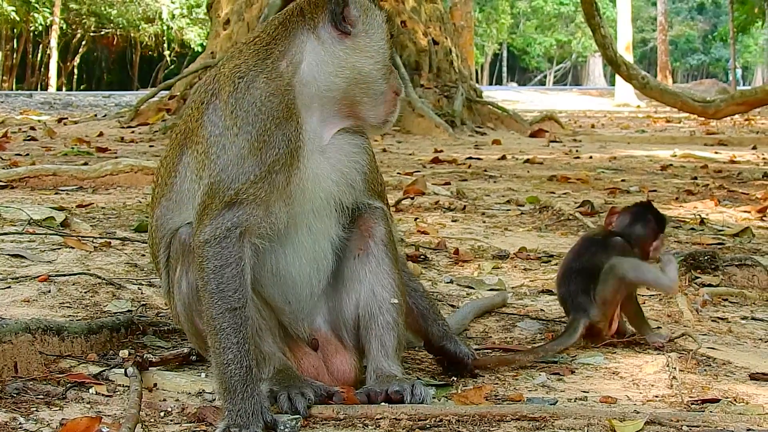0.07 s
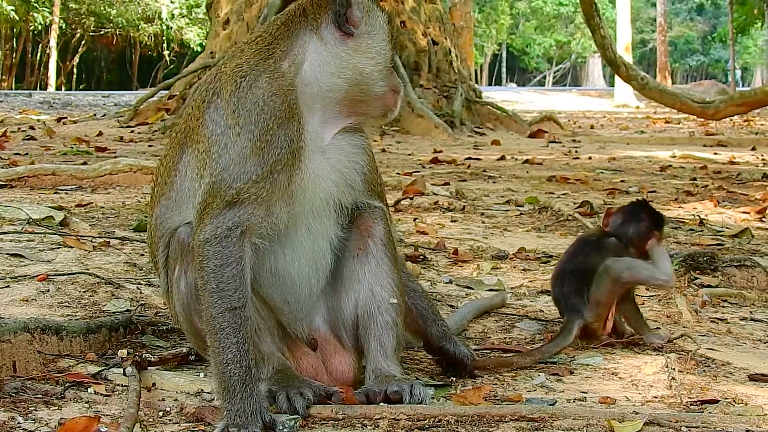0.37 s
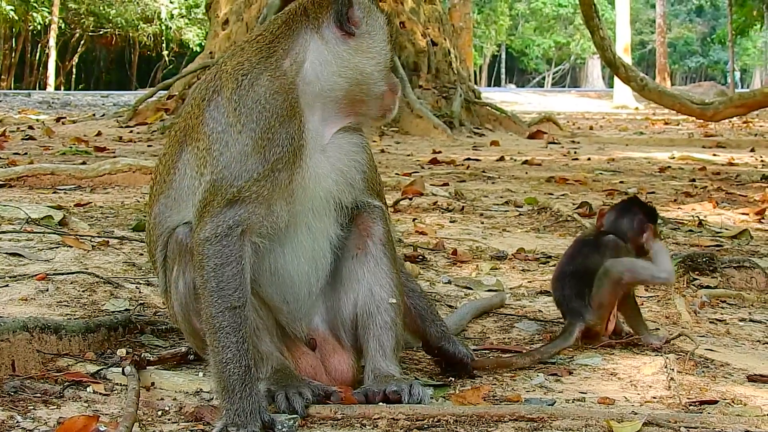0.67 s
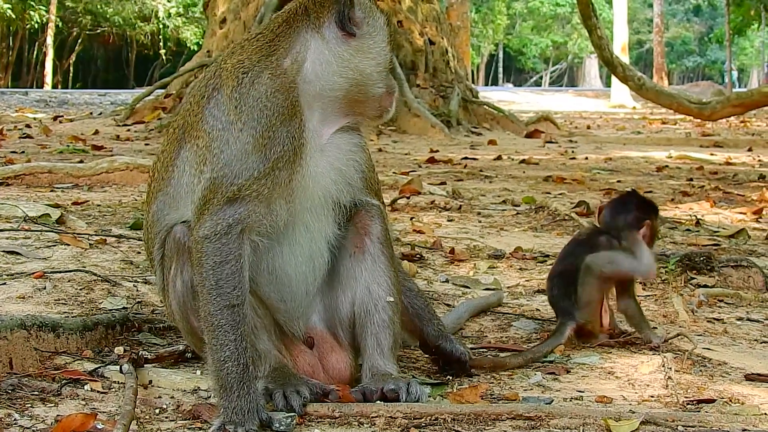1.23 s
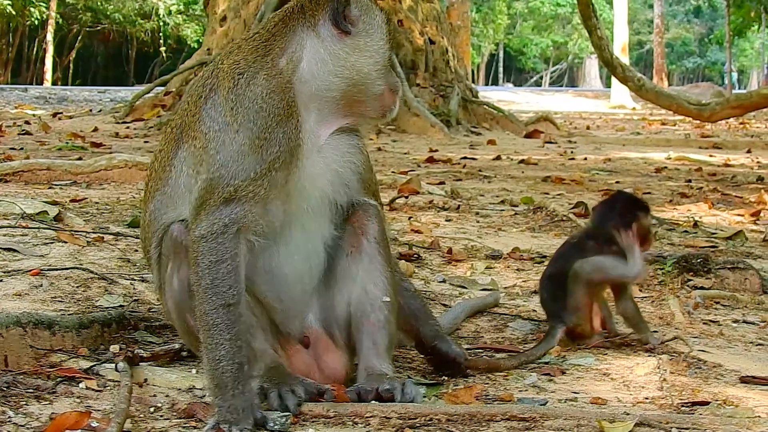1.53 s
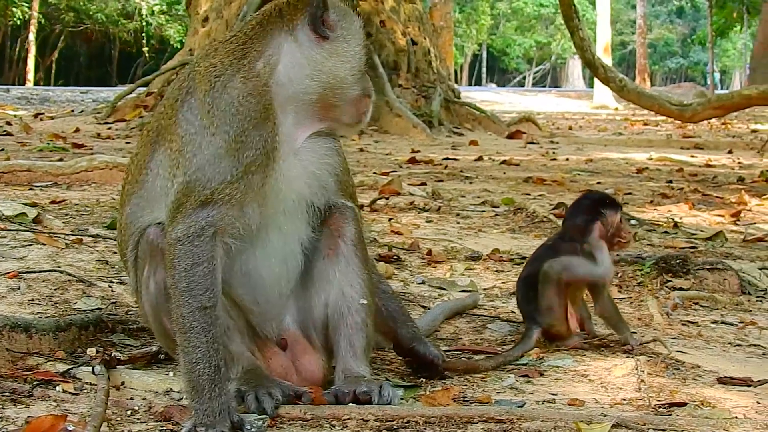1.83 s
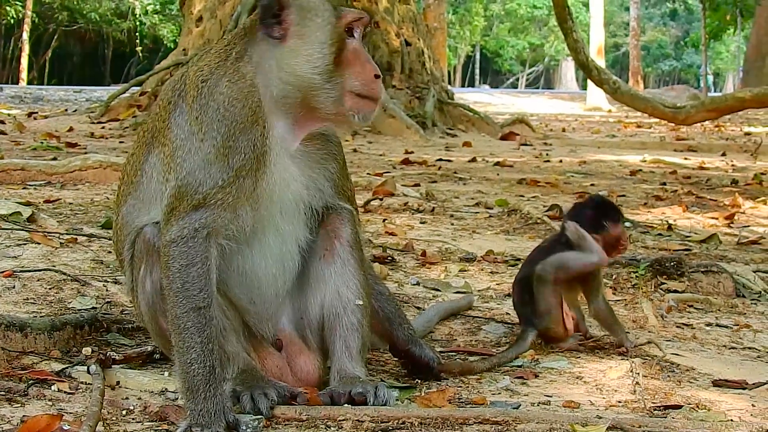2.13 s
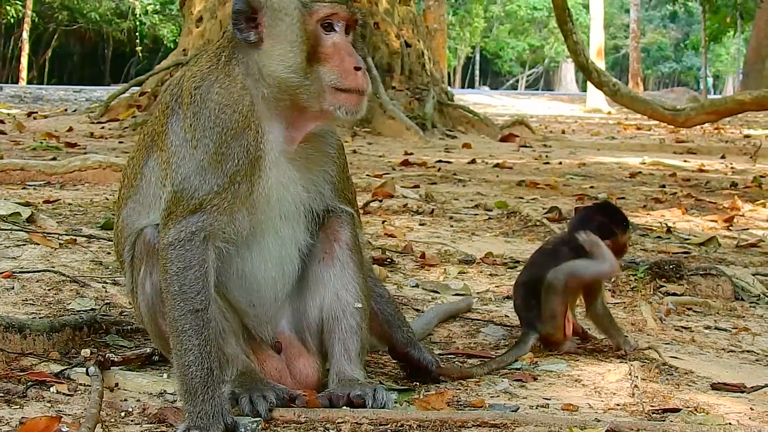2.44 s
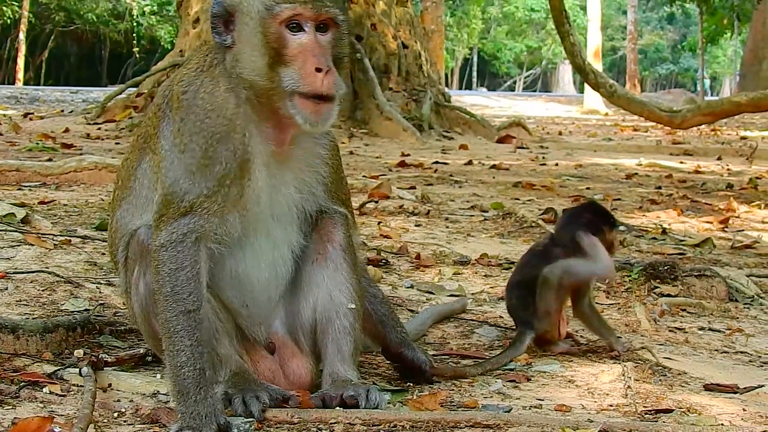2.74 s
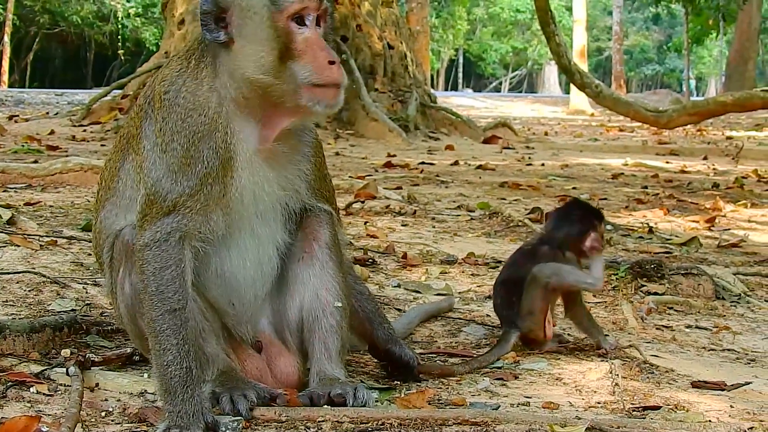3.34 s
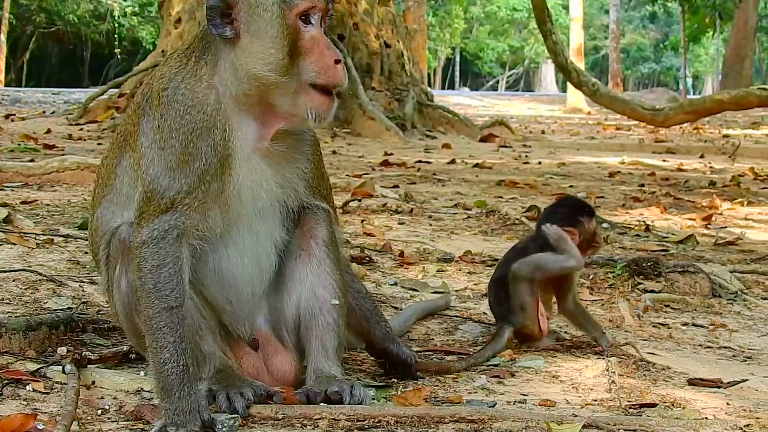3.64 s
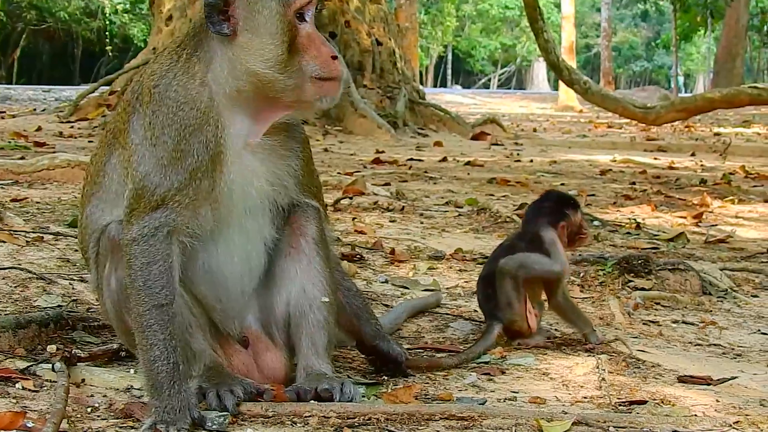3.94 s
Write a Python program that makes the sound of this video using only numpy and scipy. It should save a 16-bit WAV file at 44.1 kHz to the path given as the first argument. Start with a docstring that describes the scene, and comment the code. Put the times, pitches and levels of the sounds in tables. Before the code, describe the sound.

Very close to the microphone, dry leaves crackle and scuff on a forest floor, opening with a sharp snap and another soon after. Short rustles, ticks and soft bumps continue while light wind and a far engine murmur underneath.

```python
"""Dry leaves rustle on forest ground, very close to a microphone with two ports.
Each sweep is a shower of tiny crackles that ring the two ports separately, and a few ticks stand out.
Firmer contact adds duller scuffs, soft bumps and two sharp snaps.
Light wind murmurs underneath, and a far engine hums as it slowly loses speed."""
import sys
import numpy as np
from scipy import signal
from scipy.fft import rfft, irfft
from scipy.io import wavfile
from scipy.ndimage import uniform_filter1d

SR = 44100
rng = np.random.default_rng(int(sys.argv[2]) if len(sys.argv) > 2 else 0)


def transcribe(signal):
    """Save signal, clipped to [-1, 1], as a 16-bit WAV file at the path in sys.argv[1]."""
    frames = np.atleast_2d(signal).T
    limited = np.clip(frames, -1, 1)
    pcm = np.round(limited * 32767).astype(np.int16)
    wavfile.write(sys.argv[1], SR, pcm)


N = 176400
TIME = np.arange(N) / SR
FREQ = np.arange(N // 2 + 1) * SR / N


def undb(db):
    """Amplitude ratio of a level in decibels."""
    return 10 ** (np.asarray(db) / 20)


def unit(x):
    """Normalisation of each channel to rms 1."""
    return x / np.sqrt(np.mean(x ** 2, axis=-1, keepdims=True))


def colour(x, spectrum):
    """Spectral shaping by (frequency [Hz], level [dB]) points; white noise keeps its power."""
    hz, db = np.array(spectrum).T
    gain = undb(np.interp(np.log(np.maximum(FREQ, 1)), np.log(hz), db))
    return irfft(rfft(x) * unit(gain), N)


def wander(rate_hz):
    """Slow random modulation: smoothed Gaussian steps of rms 1."""
    k = max(int(SR / rate_hz), 2)
    steps = np.repeat(rng.standard_normal(N // 100)[:N // k + 2], k)
    return unit(uniform_filter1d(uniform_filter1d(steps, k), k)[:N])


def pan(db):
    """Channel gains for a level difference, left minus right."""
    return undb(np.array([[db], [-db]]) / 2)


def crackles(per_s, spread_db):
    """Shot noise: random impulses of unequal size, independent at the two ports."""
    size = undb(spread_db * np.minimum(rng.exponential(size=(2, N)), 4))
    occurs = rng.random((2, N)) < per_s / SR
    return unit(occurs * size * rng.choice([-1, 1], (2, N)))


def stroke(start, rise, hold, fade_db_s):
    """Envelope with a linear rise, a plateau and an exponential decay."""
    t = TIME - start
    return np.clip(t / rise, 0, 1) * undb(-fade_db_s * np.maximum(t - rise - hold, 0))


def burst(noise, at, width_s, db):
    """Noise under a Gaussian window, with rms level db at its crest."""
    bell = np.exp(-.5 * ((TIME - at) / width_s).clip(-10, 10) ** 2)
    return unit(noise * bell) * np.sqrt(np.mean(bell ** 2)) * undb(db)


def share_bass(x, corner_hz):
    """Low-frequency coherence: long waves reach both ports alike."""
    apart = FREQ / np.hypot(FREQ, corner_hz)
    mid, side = rfft(x[0] + x[1]) / 2, rfft(x[0] - x[1]) / 2
    return irfft(mid * np.sqrt(2 - apart ** 2) + side * apart * np.array([[1], [-1]]), N)


# Line spectrum of the engine (harmonic number, rms level [dB])
ENGINE_HARMONICS = [(2, -46), (3, -43.5), (4, -53), (5, -52), (8, -53.5)]
def engine(start_hz=32.44, sag_hz_s=0.57, waver_db=2, waver_rad=0.44):
    """Harmonic series on a falling fundamental; each partial wavers in level and phase."""
    phase = 2 * np.pi * np.cumsum(start_hz - sag_hz_s * TIME) / SR
    out = np.zeros(N)
    for k, db in ENGINE_HARMONICS:
        amplitude = np.sqrt(2) * undb(db - waver_db * wander(5.98))
        offset = 2 * np.pi * rng.random() + waver_rad * wander(9)
        out += amplitude * np.sin(k * phase + offset)
    return out


# Wind spectra, in phase and in antiphase at the ports (frequency [Hz], relative density [dB])
WIND_MID_SPECTRUM = [(20, -6.5), (45, -10.5), (80, 3.5), (120, 7), (170, -4.5), (250, -3), (350, -8.5),
                     (600, -9), (1300, -14), (2500, -18), (4500, -28.5), (7000, -45.5), (11000, -48.5),
                     (16000, -51)]
WIND_SIDE_SPECTRUM = [(20, 5), (60, -1), (120, 4), (250, -0.5), (500, -3.5), (1300, -6), (2500, -12),
                      (4500, -12), (7000, -31), (11000, -40), (16000, -42)]
def wind(mid_db=-41.5, side_db=-46.5, flutter_db=1, rise_db_s=1):
    """Partially coherent noise: a low murmur that flutters and slowly grows."""
    mid, side = (colour(rng.standard_normal(N) * undb(flutter_db * wander(25.08)), spectrum)
                 for spectrum in (WIND_MID_SPECTRUM, WIND_SIDE_SPECTRUM))
    swell = undb(rise_db_s * (TIME - N / SR / 2))
    return swell * (undb(mid_db) * mid + undb(side_db) * side * np.array([[1], [-1]]))


# Soft knocks (time [s], peak level [dB], spectral peak [Hz])
SOFT_KNOCKS = [(0.062, -23, 257), (0.157, -28, 220), (0.443, -32, 202), (.477, -26.5, 226),
               (0.61, -25.5, 205), (.932, -24.5, 140), (1.2951, -18.5, 190), (1.317, -30, 223),
               (1.473, -24, 286), (1.845, -29, 280), (1.907, -24.5, 280), (2.167, -28, 220),
               (2.634, -24.5, 139), (2.660, -22, 200), (2.809, -26, 205), (3.242, -33, 230),
               (3.532, -27, 218), (3.692, -27, 304)]
def bumps():
    """A soft impact gives one smooth pressure pulse with its rebound, alike at both ports."""
    out = np.zeros(N)
    for at, db, hz in SOFT_KNOCKS:
        u = (np.pi * hz * (TIME - at)).clip(-10, 10) ** 2
        out += undb(db) * (2 * u - 1) * np.exp(-u)  # second derivative of a Gaussian
    return out


# Spectrum of a scuff (multiple of its centre frequency, relative density [dB])
SCUFF_SPECTRUM = [(.07, 0), (.25, -9.5), (.5, -1.5), (1, 0), (1.5, -1.5), (2.2, -5), (4.5, -15), (10, -77)]
# Firm contacts (start [s], rise [s], hold [s], level [dB], left minus right [dB], centre [Hz])
SCUFF_STROKES = [(0.055, .02, .11, -33, -7.5, 1080), (0.196, 0.023, 0.11, -38, -8.5, 1050),
                 (0.386, 0.0066, 0.0062, -37, -7, 1130), (0.458, 0.0066, 0.0088, -37, -2, 686),
                 (0.6, 0.0086, 0.035, -40.5, -3, 1100), (0.766, 0.041, 0.074, -36.5, -8.5, 1210),
                 (0.933, 0.011, 0.14, -38.5, -7.5, 1070), (1.152, 0.0036, .003, -43, -4, 990),
                 (1.416, 0.026, 0.039, -36, -9, 1760), (1.524, .03, .15, -43, -10.5, 1100),
                 (1.801, 0.0056, 0.017, -37, -9, 780), (1.89, .006, 0.0063, -42.5, -10, 700),
                 (1.975, 0.015, 0.051, -34.5, -2, 1090), (2.049, 0.042, 0.073, -31, -8.5, 1240),
                 (2.276, 0.0058, 0.0088, -37, -3, 660), (2.48, 0.0077, 0.0089, -39, -2, 1240),
                 (2.558, 0.0083, 0.01, -43, 0, 1000), (2.689, 0.01, 0.0081, -43.5, -5, 1680),
                 (2.861, 0.0087, 0.014, -29.5, -9.5, 1470), (2.913, .008, .008, -59, -4, 1200),
                 (2.994, 0.0085, .008, -34, -1, 820), (3.03, 0.0084, 0.014, -41, -7, 700),
                 (3.092, 0.0018, 0.0035, -35, -3, 950), (3.109, 0.0096, 0.015, -29.5, -2.5, 1150),
                 (3.162, 0.0067, 0.01, -42, -5, 1250), (3.436, 0.014, .01, -41.5, 1, 1380),
                 (3.533, 0.005, .007, -32.5, 2, 1280), (3.66, 0.017, 0.078, -43, -4, 794),
                 (3.863, 0.0049, 0.0071, -42.5, -5, 796)]
def scuffs(flicker_db=2, fade_db_s=253):
    """Stick-slip friction: firmer contact catches and slips unevenly, mostly on the right."""
    catches = crackles(per_s=2600, spread_db=3.5) * undb(flicker_db * wander(110))
    out = np.zeros((2, N))
    for start, rise, hold, db, side_db, hz in SCUFF_STROKES:
        spectrum = [(k * hz, level) for k, level in SCUFF_SPECTRUM]
        friction = catches * stroke(start, rise, hold, fade_db_s)
        out += colour(friction, spectrum) * undb(db) * pan(side_db)
    return out


# Spectra of a snap's rub and release (frequency [Hz], relative density [dB])
RUB_SPECTRUM = [(80, -3), (250, 5.5), (700, 6), (1300, -1), (2300, 0), (3300, -11), (6000, -55),
                (12000, -65)]
RELEASE_SPECTRUM = [(200, -40), (2200, -14), (3200, 3), (4400, 0.5), (5000, 3), (6000, -7.5), (8000, -18),
                    (11000, -43), (16000, -42)]
# Snaps (release time [s], rub level [dB], release level [dB], release left minus right [dB])
SNAP_EVENTS = [(0.0731, -16, -8, -3), (0.9392, -18.5, -10.5, 1)]
def snaps(rub_lead_s=0.0098):
    """Sudden release of stress: a dull rub gives way in a bright transient."""
    rub = share_bass(colour(rng.standard_normal((2, N)), RUB_SPECTRUM), corner_hz=700)
    release = colour(rng.standard_normal((2, N)), RELEASE_SPECTRUM)
    out = np.zeros((2, N))
    for at, rub_db, release_db, side_db in SNAP_EVENTS:
        out += burst(rub, at - rub_lead_s, width_s=0.004, db=rub_db)
        out += burst(release, at, width_s=0.0016, db=release_db) * pan(side_db)
    return out


# Spectrum of a tick (multiple of its pitch, relative density [dB])
TICK_SPECTRUM = [(.1, -35), (.5, -6), (.75, -14), (1, 5.5), (1.15, -0.5), (1.4, -20), (2, -38.5), (3, -65)]
# Single crackles that stand out of the rustle (time [s], level [dB], pitch [Hz])
TICK_EVENTS = [(0.332, -21.5, 3960), (0.676, -27, 4300), (.706, -28, 4600), (0.7396, -26, 4600),
               (.770, -22.5, 4670), (.791, -24, 4540), (1.9145, -25.5, 4700), (1.944, -29, 4000),
               (2.151, -17.5, 4120), (2.168, -12.5, 4130), (2.586, -28, 4500), (2.886, -18.5, 4700),
               (3.893, -37, 6550)]
def ticks(width_s=0.001):
    """Band-limited transients: a spectral peak gives each dry crackle its pitch."""
    noise = rng.standard_normal((2, N))
    out = np.zeros((2, N))
    for at, db, hz in TICK_EVENTS:
        spectrum = [(k * hz, level) for k, level in TICK_SPECTRUM]
        out += burst(colour(noise, spectrum), at, width_s, db)
    return out


# Spectrum of the crackles at the ports (frequency [Hz], relative density [dB])
RUSTLE_SPECTRUM = [(60, -24), (250, -3.5), (700, -26), (1500, -13), (2500, -9), (3300, -5), (4200, -0.5),
                   (4900, -1), (5700, -10), (7000, -21), (9000, -34.5), (11500, -50.5), (16000, -65)]
# Sweeps of rustle (start [s], rise [s], hold [s], level [dB], decay [dB/s], tilt [dB/octave])
RUSTLE_SWEEPS = [(.08, 0.019, 0.071, -19, 93, 0), (0.303, 0.029, .018, -29.5, 74, 0.5),
                 (0.385, 0.013, 0.071, -37, 65, 2.5), (0.592, 0.025, 0.23, -40, 53, 0),
                 (0.778, 0.036, 0.03, -26.5, 39, 0.5), (0.943, 0.039, 0.11, -29, 110, 1.5),
                 (1.295, 0.034, 0.064, -37.5, 50, -2.5), (1.441, 0.0077, 0.098, -23, 76, 0.35),
                 (1.618, .03, 0.028, -30.5, 63, 0), (1.705, 0.0072, .02, -30, 70, 2),
                 (1.8, .025, .028, -32, 150, -1), (1.902, 0.0092, 0.041, -34, 96, 1),
                 (1.984, 0.13, .03, -25.5, 147, 0), (2.103, 0.04, 0.04, -24.5, 270, 0),
                 (2.21, 0.086, 0.089, -30.5, 60, 0), (2.493, 0.031, 0.066, -36, 134, 0),
                 (2.702, 0.0087, 0.007, -30, 224, 0.5), (2.737, .012, .015, -39.5, 125, 2.5),
                 (2.81, 0.031, 0.12, -31.5, 85, -0.5), (2.875, 0.011, 0.011, -22, 300, 0),
                 (2.989, 0.024, 0.04, -30.5, 110, -1.5), (3.109, 0.019, 0.037, -32, 119, 0),
                 (3.461, 0.093, 0.042, -31, 58, .5), (3.644, 0.048, 0.038, -29, 102, -.5),
                 (3.82, 0.0082, 0.11, -37, 90, -1)]
def rustle(rest_db=-46.5, hiss_gain=0.64, flicker_db=1.14, side_db=-0.45):
    """Superposed impulses: dense leaf crackles merge into sweeps over a faint resting rustle."""
    grains = unit(crackles(per_s=5000, spread_db=3) + hiss_gain * rng.standard_normal((2, N)))
    flicker = undb(flicker_db * wander(90))
    out = undb(rest_db) * colour(grains * flicker, RUSTLE_SPECTRUM)
    for start, rise, hold, db, fade_db_s, tilt in RUSTLE_SWEEPS:
        shower = np.roll(grains, rng.integers(N), axis=1) * flicker
        spectrum = [(hz, level + tilt * np.log2(hz)) for hz, level in RUSTLE_SPECTRUM]
        out += undb(db) * colour(shower * stroke(start, rise, hold, fade_db_s), spectrum)
    return out * pan(side_db)


def scene():
    """Linear superposition of close rustle and knocks with wind and engine hum."""
    leaves = share_bass(rustle() + scuffs(), corner_hz=420)
    return leaves + snaps() + ticks() + bumps() + wind() + engine()


def record(dry, cutoff_hz=15800):
    """Hard limiting at full scale, then an elliptic low-pass filter."""
    low_pass = signal.ellip(8, .2, 70, cutoff_hz, fs=SR, output="sos")
    return signal.sosfilt(low_pass, np.clip(dry, -1, 1))


dry = scene()
out = record(dry)
transcribe(out)
```